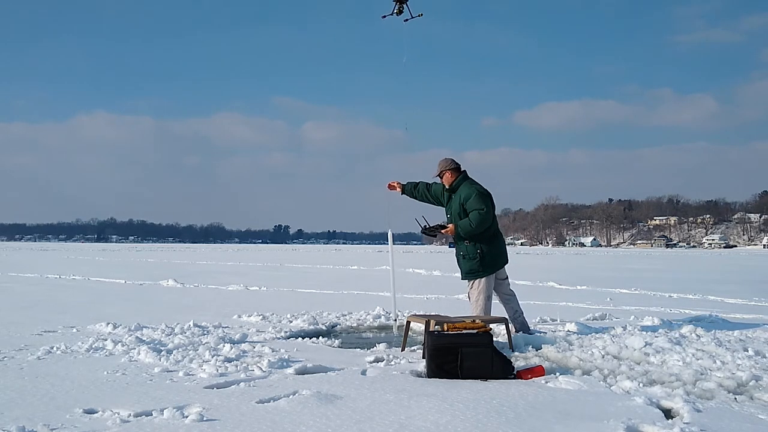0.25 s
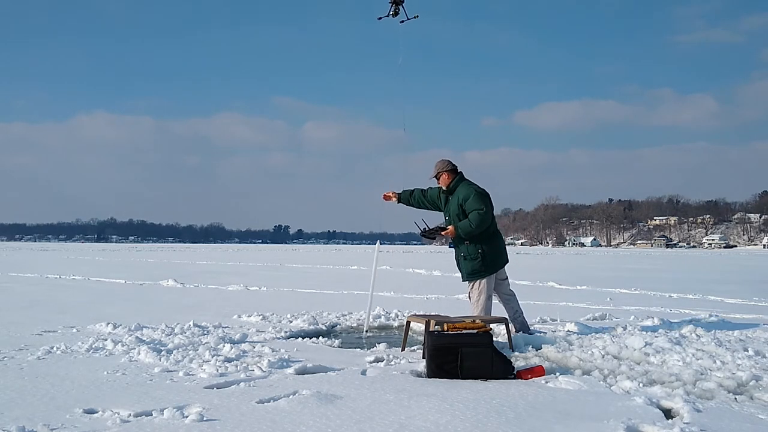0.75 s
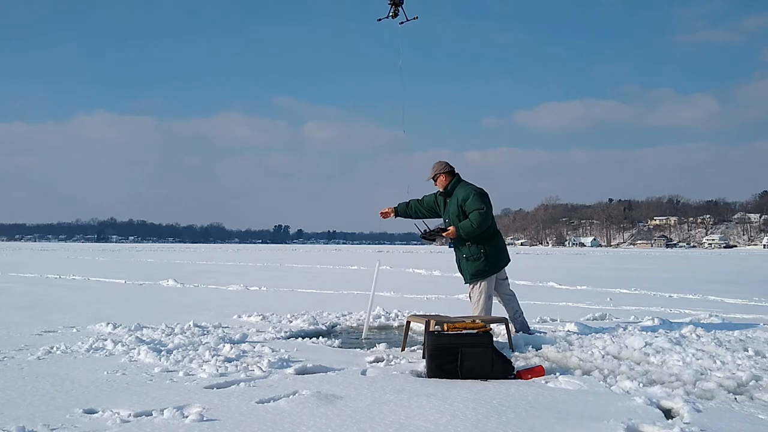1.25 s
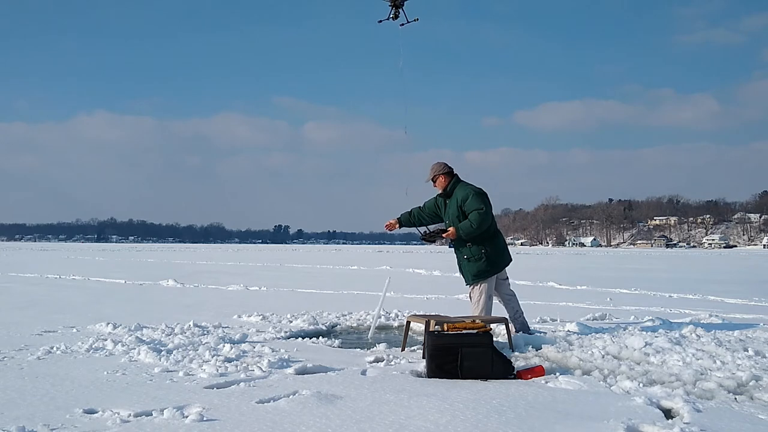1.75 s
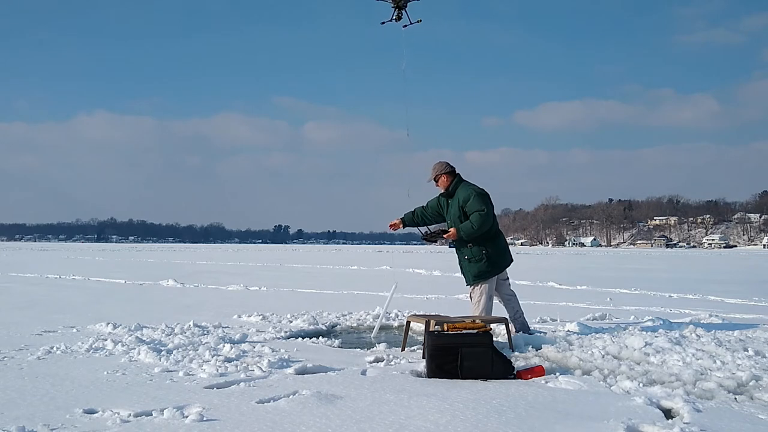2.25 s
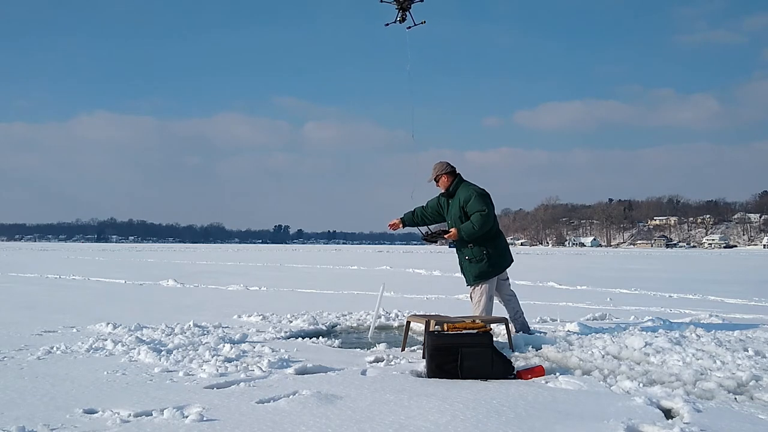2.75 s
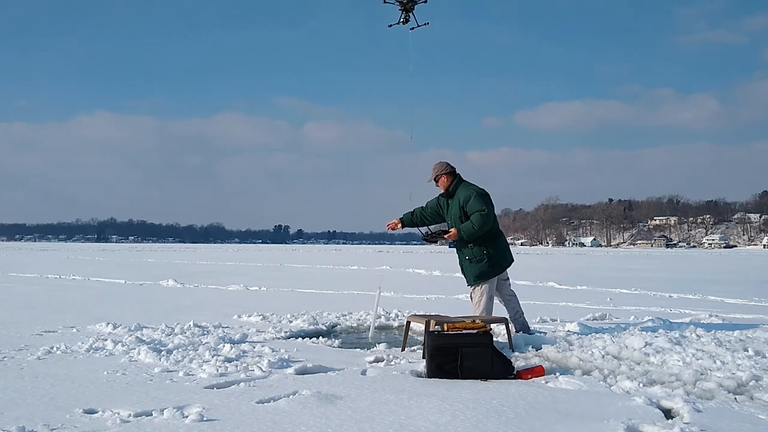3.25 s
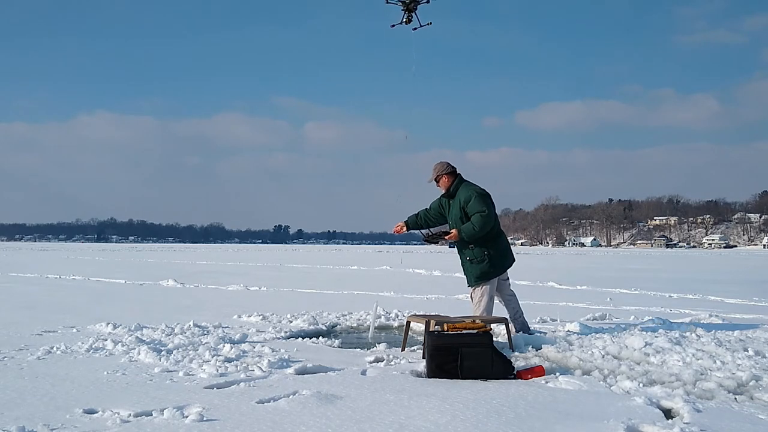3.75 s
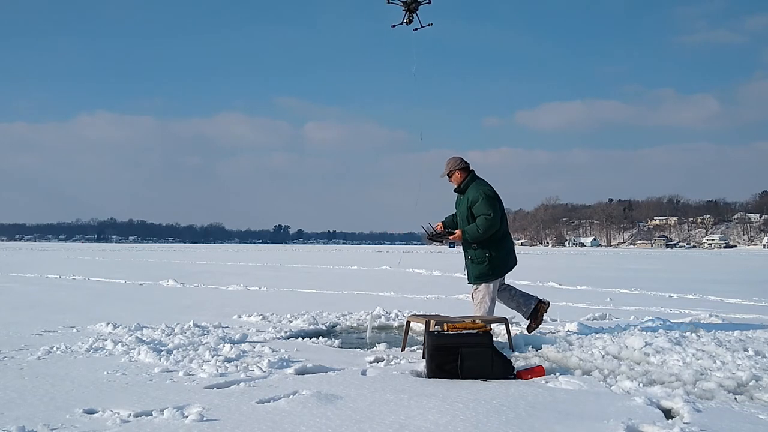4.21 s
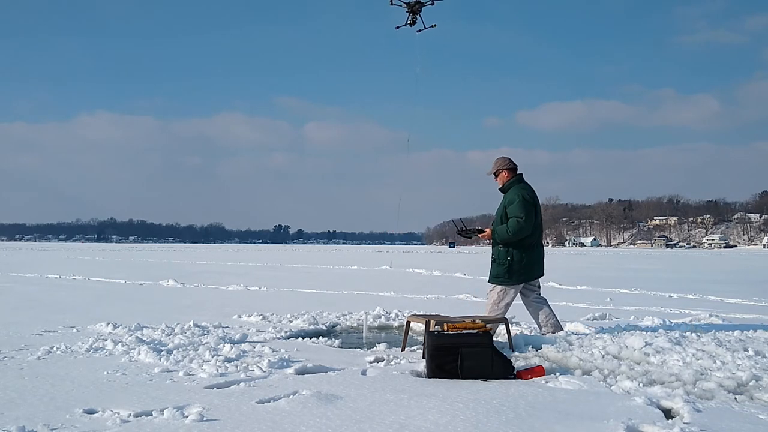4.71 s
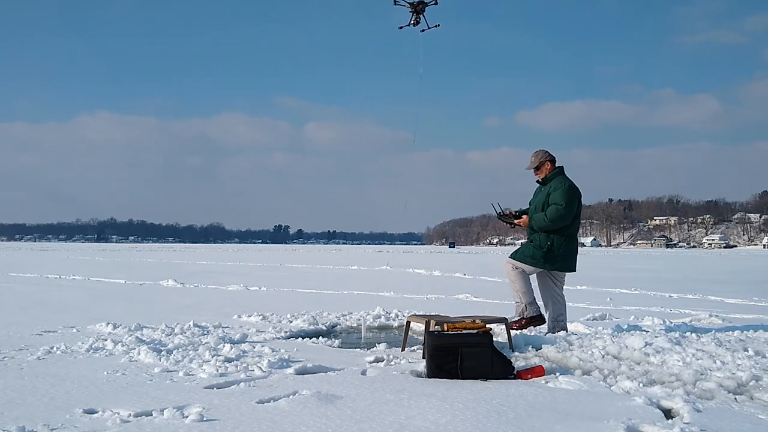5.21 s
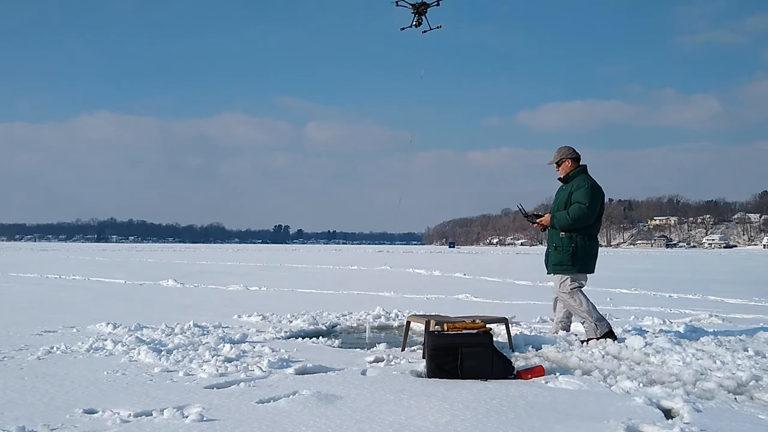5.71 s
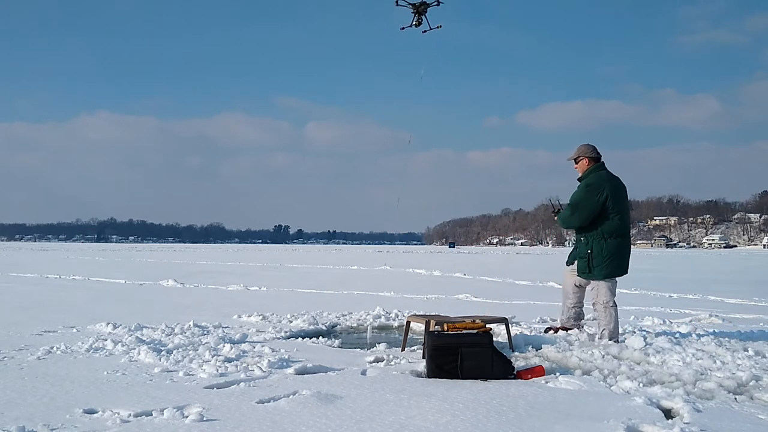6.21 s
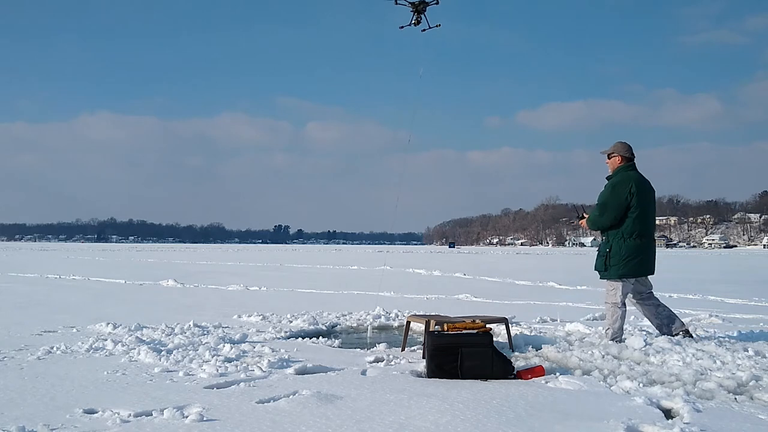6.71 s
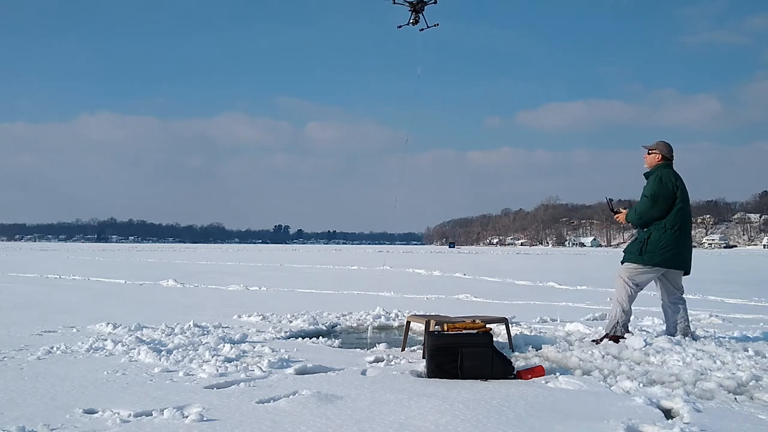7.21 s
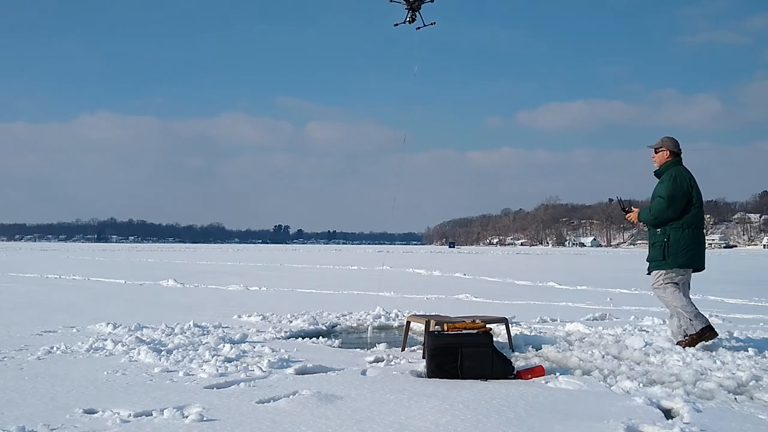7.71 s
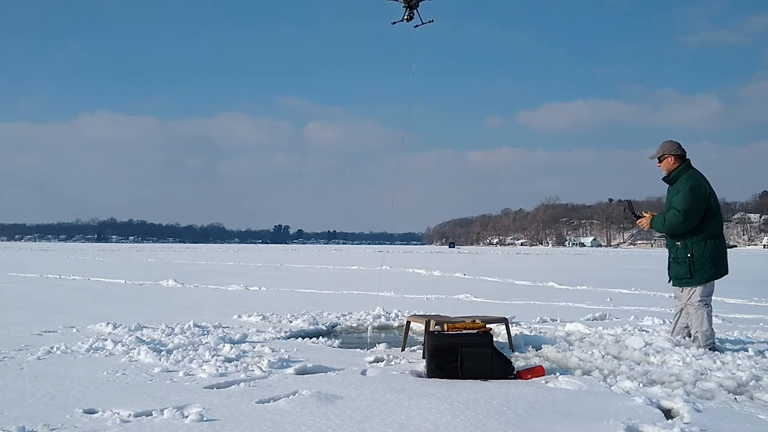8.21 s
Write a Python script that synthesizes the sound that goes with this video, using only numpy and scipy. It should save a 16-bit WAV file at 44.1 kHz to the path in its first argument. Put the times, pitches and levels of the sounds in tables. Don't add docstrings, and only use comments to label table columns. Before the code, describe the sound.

A multirotor drone hovers steadily overhead with rushing, fluttering blade noise and a thin motor whine while wind thumps the microphone on an open frozen lake.

```python
import sys
import numpy as np
from scipy import signal
from scipy.fft import rfft, irfft, next_fast_len
from scipy.io import wavfile
from scipy.ndimage import uniform_filter1d, map_coordinates

SR = 44100
rng = np.random.default_rng(int(sys.argv[2]) if len(sys.argv) > 2 else 0)


def amplitude_ratio(level_db):
    exponent = np.asarray(level_db, float) / 20
    return 10 ** exponent


def to_wav(s):
    ch = np.atleast_2d(s).T
    pcm = np.round(np.clip(ch, -1, 1) * 32767)
    wavfile.write(sys.argv[1], SR, pcm.astype(np.int16))


N = 373067
SIZE = next_fast_len(N)
HZ = np.maximum(np.arange(SIZE // 2 + 1) * SR / SIZE, 1)
TIME = np.arange(N) / SR

# start_s, whine_hz
MOTOR_1 = [(0, 5240), (.35, 5185), (.7, 5260), (.85, 5210), (1.1, 5240), (1.2, 5200), (1.4, 5235),
           (1.8, 5190), (2.15, 5360), (2.4, 5250), (2.55, 5260), (2.75, 5200), (3.15, 5320), (3.3, 5255),
           (3.5, 5290), (3.9, 5230), (4.1, 5320), (4.35, 5210), (4.6, 5290), (4.7, 5255), (4.85, 5320),
           (5.0, 5285), (5.15, 5240), (5.3, 5280), (5.5, 5200), (5.62, 5300), (5.9, 5360), (6.2, 5440),
           (6.5, 5310), (6.7, 5380), (7.3, 5430), (7.7, 5520), (8.0, 5480), (8.3, 5530), (8.46, 5480)]
MOTOR_2 = [(0, 5130), (.5, 5150), (.8, 5120), (1.5, 5135), (1.8, 5120), (2.2, 5150), (2.5, 5140),
           (2.8, 5110), (3.2, 5150), (3.6, 5130), (4.0, 5170), (4.3, 5120), (4.6, 5140), (4.95, 5180),
           (5.1, 5150), (5.5, 5110), (5.65, 5150), (5.9, 5180), (6.05, 5160), (6.5, 5140), (6.75, 5115),
           (7.1, 5170), (7.45, 5190), (7.75, 5170), (8.0, 5120), (8.2, 5180), (8.46, 5110)]
# start_s, blade_rate_hz
ROTOR_3 = [(0, 170), (2, 170.5), (4.2, 173), (4.7, 175.5), (5.3, 177), (5.5, 172), (5.75, 170),
           (6.2, 172.5), (6.5, 170.5), (7.0, 172.5), (7.5, 176), (8.0, 173.5), (8.3, 176), (8.46, 174)]
ROTOR_4_HZ, WANDER_HZ = 167, 0.9
POLES = 28
HUNT, HUNT_PER_S = 0.0027, 15
HOVER_HZ, STRAIN_PER_HZ = 186.5, 0.0003
LOAD_DB_PER_HZ = 0.36

# swish_db, whine_db
ROTOR_SHARE = [
    (3, 0),
    (-6, 0),
    (-9.5, -7),
    (-13, -6),
]
# multiple_of_blade_rate, rotor_1_db, rotor_2_db, rotor_3_db, rotor_4_db
BLADE_HUM = [(2, -64, -61, -79, -72), (3, -71, -67.5, -64, -64.5), (4, -72, -89, -91, -70),
             (5, -70, -70, -65.5, -71.5), (7, -68, -74.5, -81, -130), (8, -92, -69.5, -67.5, -80),
             (9, -71, -92, -102, -89), (10, -89, -79, -73, -117), (12, -71.5, -75, -95, -96),
             (14, -70, -70, -75, -76), (16, -75, -77.5, -70.5, -80), (19, -72, -75, -89, -81)]
# pitch_hz, density_db_per_hz
SWISH = [(200, -25), (500, -30), (900, -10), (1400, -14), (1750, -12.5), (2150, -12.5), (3000, -15.5),
         (4000, -58), (4400, -38.5), (6100, -42.5), (7200, -7.5), (9000, -57), (11000, -20), (15000, -30)]
# pitch_hz, width_hz, level_db
FRAME_RINGS = [(2761, 283, -0.5), (2953, 58, -13.5), (3275, 72, -1), (3669, 280, -6.5), (4561, 106, -6),
               (4826, 110, -2.5), (5100, 250, 0.5)]
# start_s, level_db
DRIFT = [(0, -42), (1.6, -42), (2.8, -42), (3.6, -44), (5.5, -44.5), (6.7, -43), (7.5, -45), (8.0, -42.5),
         (8.46, -42)]
ARM_HZ, ARM_WIDTH_HZ, ARM_DB, ARM_SWELL_DB = 3597, 110, -16, 2.2

# pitch_hz, width_hz, level_db
MOTOR_BELLS = [(5180, 150, 3.5), (5400, 150, -7), (4940, 200, -5)]
# start_s, motor_1_db, motor_2_db
FACING = [(0, 0, -1), (.8, 0, 0), (1.8, 1, 0), (2.2, 2, -5), (2.7, 1, 0), (3.2, 0, -2), (4.0, 0, 0),
          (4.7, 0, -2), (5.0, 1, 0), (5.55, 1, 0), (5.7, -1, -5), (6.0, 3, -1), (6.15, 0, 4), (6.4, 3, 2),
          (6.5, 7, 3), (6.62, -3, 5), (7.3, -4, 3), (7.8, -6, 0), (8.25, -6, 1), (8.46, -6, -3)]
WHINE_DB, WHINE_SAG_DB_PER_S = -41, -0.72
NULL_S, NULL_LENGTH_S, NULL_DB = 7.57, 0.19, -16
BEARING_DB = -13

# start_s, level_db
SWITCHING = [(0.0, -62), (0.52, -62), (0.75, -55), (0.82, -70), (1.48, -61), (1.72, -64), (1.81, -85),
             (1.92, -66), (2.12, -45), (2.83, -75), (3.16, -45), (3.25, -56), (3.91, -64), (4.1, -48),
             (4.38, -68), (4.81, -49), (5.46, -68), (5.7, -53), (6.93, -51), (7.4, -52), (7.9, -60),
             (8.0, -50), (8.2, -60), (8.46, -48)]
# start_s, pitch_hz
SWITCHING_CENTRE = [(0, 15700), (1.8, 15700), (2.2, 15630), (2.7, 15710), (4.1, 15680), (5.0, 15670),
                    (5.5, 15690), (6.4, 15630), (6.85, 15640), (7.3, 15700), (8.0, 15740), (8.46, 15720)]
SWITCHING_WIDTH_HZ, SWITCHING_FLICKER_DB = 84, 2.5

# start_s, lag_ms
ICE_LAG = [(0, 2.3), (5.5, 2.305), (7.3, 2.27), (8.46, 2.29)]
ROTOR_LAG = [0, -.015, .015, .025]
# pitch_hz, level_db
SNOW_CRUST = [(200, -.5), (2300, -.8), (3000, -5), (4500, -8), (8000, -16)]
# pitch_hz, level_db
STRAY = [(300, 6), (1200, 6), (2000, 4), (3500, -1), (8000, -4.5)]

# pitch_hz, left_minus_right_db
PORT_BALANCE = [(300, -0.5), (1300, -1.5), (2400, -6), (3000, -2.5), (3250, -8.5), (3500, -5), (4400, -3),
                (6500, -10.5), (8500, 21.5), (10500, -5), (15000, -7)]
# pitch_hz, left_lead_rad
PORT_PHASE = [(300, -.3), (1300, -.7), (2500, -.6), (7500, -.6), (8100, -.5), (9600, -2.4), (10700, -1.5),
              (14000, -1.7), (15700, -2.3)]
# pitch_hz, width_hz, left_db, right_db
WHISTLES = [(4090, 70, -75, -72), (5865, 110, -84, -67), (7090, 100, -74, -63), (7265, 110, -66, -70),
            (7790, 80, -75, -82), (8115, 60, -86, -76), (9550, 85, -65, -57.5), (10680, 150, -76, -82),
            (12990, 70, -92, -78), (13900, 100, -82, -84), (14300, 120, -81, -72), (14720, 150, -72, -75)]
# pitch_hz, density_db_per_hz
HISS_LEFT = [(300, -28), (4000, 1.5), (5300, -0.5), (5700, -4), (6400, -4.5), (7000, -13), (8000, -1.5),
             (9200, 0), (10000, -4), (11400, -19), (12300, -17), (15500, -8.5)]
HISS_RIGHT = [(300, -42), (4000, -16), (6200, 1.5), (8500, 2.5), (10000, 7), (12000, -11.5), (15500, 4.5)]
HISS_DB = -54

# start_s, gust_db, bite_db
GUSTS = [(0.0, -31.5, -10.5), (0.38, -34, -12), (0.64, -31.5, -12), (1.06, -36.5, -11), (1.22, -35, -12.5),
         (1.74, -33.5, -17.5), (2.05, -31.5, -20), (3.01, -32.5, -10), (3.53, -37, -15.5), (3.77, -37, -11),
         (4.38, -34.5, -17), (4.57, -36, -13.5), (5.98, -34, -12), (6.2, -38.5, -17), (6.62, -34.5, -16),
         (7.61, -36, -20.5), (7.78, -35.5, -21), (8.46, -39.5, -14.5)]
# pitch_hz, density_db_per_hz
WIND_RIGHT = [(12, -76), (20, -27), (38, -21), (91, -1), (140, 1), (187, -1.5), (370, -6.5), (536, -17),
              (800, -36.5), (1040, -44.5), (1760, -120)]
WIND_LEFT = [(20, -21), (45, -19), (65, -6), (92, 0), (130, -6), (190, -11), (230, -20), (290, -29),
             (600, -50)]
PUFF_DB, PUFF_PER_S, BITE_SPREAD_DB = 1.2, 11, 1.5
LEE_DB, LEE_SPREAD_DB, LEE_FOLLOW = -51.5, 3.0, 0.5
# start_s, peak_db, pitch_hz
THUMPS = [(0.014, -8.5, 182), (0.037, -7, 228), (0.082, -13.5, 250.0), (0.175, -14, 181),
          (0.289, -14.5, 295), (0.459, -10.5, 263), (0.486, -12, 243), (0.507, -12, 188),
          (0.54, -15, 220.0), (0.554, -9.5, 158), (0.588, -8.5, 220.0), (0.614, -8, 200.0),
          (0.837, -10, 233), (0.871, -10, 190.0), (1.039, -8.5, 202), (1.055, -8, 260.0), (1.401, -11, 193),
          (1.927, -11, 224), (1.989, -11.5, 187), (2.241, -10, 242), (2.297, -8.5, 231), (2.427, -11, 178),
          (2.592, -12, 170.0), (2.649, -9.5, 209), (2.683, -9, 199), (2.776, -14, 258), (2.791, -13, 200.0),
          (2.915, -8, 240.0), (2.951, -14, 292), (2.973, -15, 190.0), (3.068, -5.5, 157),
          (3.088, -11, 260.0), (3.882, -12.5, 246), (3.949, -13, 206), (4.078, -9, 210), (4.372, -13, 231),
          (4.383, -8, 186), (4.397, -16, 242), (4.418, -8.5, 228), (4.446, -13, 237), (4.587, -12.5, 222),
          (5.129, -12, 190.0), (5.199, -12, 268), (5.318, -10, 189), (5.505, -11, 270.0), (5.62, -11, 256),
          (5.715, -11.5, 276), (5.888, -10, 254), (5.931, -12, 210.0), (5.967, -8.5, 177),
          (6.038, -10, 267), (6.459, -8.5, 193), (6.753, -11, 223), (7.809, -11.5, 250.0),
          (7.885, -11.5, 170.0),
          (0.071, -18, 199), (0.127, -15, 230.0), (0.211, -11, 181), (0.393, -18, 248),
            (0.446, -11, 220.0), (0.527, -18, 230.0), (0.643, -17, 270.0), (0.683, -17, 210.0),
            (0.715, -11, 210.0), (0.732, -13.5, 190.0), (0.782, -13, 180.0), (1.09, -9, 213),
            (1.534, -14.5, 202), (1.659, -16, 220.0), (1.836, -17.5, 218), (2.058, -17.5, 180.0),
            (2.2, -15, 150.0), (2.365, -13, 200.0), (2.474, -16, 178), (2.573, -15, 190.0),
            (2.665, -16, 220.0), (2.703, -15, 200.0), (2.868, -12, 191), (3.005, -19, 237),
            (3.036, -13, 237), (3.109, -16, 170.0), (3.162, -12, 248), (3.215, -19, 200.0),
            (3.28, -11.5, 237), (3.753, -11, 210.0), (4.308, -13, 200.0), (4.34, -13, 190.0),
            (4.505, -15, 200.0), (4.674, -15, 207), (4.691, -13.5, 220.0), (4.831, -13, 251),
            (4.879, -13.5, 274), (4.899, -12.5, 210.0), (4.984, -13, 266), (5.106, -13, 200.0),
            (5.236, -16, 287), (5.685, -18, 188), (5.823, -13, 250.0), (5.843, -16.5, 330),
            (5.914, -13.5, 260.0), (5.999, -18, 220.0), (6.366, -11, 188), (6.431, -12, 225),
            (6.491, -13.5, 212), (6.843, -14, 240.0), (7.157, -14.5, 210.0), (7.226, -12.5, 170.0),
            (7.338, -12, 207), (7.688, -16, 180.0), (8.273, -15.5, 195),
          (0.151, -18, 180.0), (0.242, -20, 285), (0.32, -14, 160.0), (0.357, -18, 160.0),
        (0.433, -13, 230.0), (0.626, -19, 250.0), (0.702, -20, 280.0), (0.821, -17, 199), (0.986, -18, 248),
        (1.156, -16, 208), (1.238, -17.5, 285), (1.275, -17, 210.0), (1.32, -16, 246),
        (1.475, -17.5, 200.0), (1.515, -15.5, 220.0), (1.698, -20, 230.0), (1.784, -17, 220.0),
        (1.877, -19, 160.0), (1.896, -13.5, 200.0), (1.912, -9.5, 150.0), (1.942, -15, 190.0),
        (2.02, -15, 304), (2.036, -18, 230.0), (2.083, -22, 200.0), (2.161, -18, 179), (2.39, -25, 180.0),
        (2.447, -16, 150.0), (2.489, -22, 160.0), (2.61, -17, 257), (2.76, -22, 160.0), (2.889, -17, 242),
        (3.176, -16, 239), (3.505, -13.5, 198), (3.666, -19.5, 202), (3.733, -16, 191), (4.178, -14.5, 212),
        (4.25, -17, 176), (4.526, -18, 210.0), (4.615, -18, 332), (4.804, -15, 228), (5.005, -14.5, 240.0),
        (5.399, -17, 190.0), (6.073, -13.5, 170.0), (6.175, -15.5, 201), (6.708, -19, 306),
        (6.911, -18, 190.0), (6.941, -15, 177), (6.971, -16, 208), (7.319, -20, 200.0), (7.846, -17.5, 222),
        (8.048, -14.5, 197), (8.123, -18, 274), (8.191, -15.5, 210.0), (8.258, -18, 233),
        (8.441, -18.5, 188)]
EDDY_CYCLES, EDDY_PHASE, EDDY_PHASE_SPREAD = 0.72, 2.9, 0.9
EDGE_HZ, EDGE_DB, EDGE_DB_PER_HZ, EDDY_SAG = 480, -16, 0.045, 0.12

# start_s, level_db, pitch_hz, length_s
CRUNCH = [
    (8.377, -56, 11050, 0.018),
    (8.446, -56, 8200, 0.028),
]

# pitch_hz, density_db_per_hz
GATE_FLOOR = [(300, -125), (650, -98), (1100, -95), (4200, -95.5), (5700, -95), (6300, -97), (7800, -101),
              (9000, -107), (13000, -106), (14700, -101), (15100, -92), (15500, -93)]
FRAME_SIZE, FRAME_SHIFT, BAND_BINS, TOP_HZ = 2048, 504, 12, 15800
MASK_DB, MASK_BINS, MASK_FROM_HZ = -11.3, 45, 950


def level(x, db):
    return x * amplitude_ratio(db) / np.sqrt(np.mean(x ** 2))


def curves(table):
    s, *columns = np.transpose(table)
    return [np.interp(TIME, s, c) for c in columns]


def over_hz(points):
    hz, value = np.transpose(points)
    return np.interp(np.log(HZ), np.log(np.maximum(hz, 1)), value)


def rings(hz, modes):
    return np.sqrt(sum((amplitude_ratio(db) / (1 + (2 * (hz - f) / w) ** 2)) ** 2 for f, w, db in modes))


def colour(x, gain):
    return irfft(rfft(x, SIZE) * gain, SIZE)[..., :N]


def walk(rate):
    k = int(SR / rate)
    held = np.repeat(rng.standard_normal(N // k + 1), k)
    return 1.331 * uniform_filter1d(uniform_filter1d(held, k), k)[:N]


def blade_rates():
    near = [curves(motor)[0] / POLES * (1 + HUNT * walk(HUNT_PER_S)) for motor in (MOTOR_1, MOTOR_2)]
    strain = STRAIN_PER_HZ * np.maximum(near[0] - HOVER_HZ, 0) * walk(90)
    far = [hz + WANDER_HZ * walk(4) for hz in (curves(ROTOR_3)[0], ROTOR_4_HZ)]
    return [near[0] * (1 + strain), near[1]] + far


def whine(hz, turn, orders, bell, flutter_db):
    return sum(rings(k * hz, bell) * amplitude_ratio(flutter_db * walk(14)) * np.sin(k * turn) for k in orders)


def rotor(hz, hum_db, swish_db, whine_db):
    hz = hz * (1 + 0.000781 * walk(25))
    turn = 2 * np.pi * np.cumsum(hz) / SR + 2 * np.pi * rng.random()
    hum = 0
    for k, db in hum_db:
        swell = amplitude_ratio(db + 1.1 * walk(7.8))
        roughness = 1 + 0.16 * k * walk(45)
        hum = hum + swell * roughness * np.sin(k * turn + 2 * np.pi * rng.random())
    hum = hum * amplitude_ratio(LOAD_DB_PER_HZ * (hz - np.mean(hz)))
    chop = 1 + 0.84 * np.cos(turn) + 0.32 * np.cos(2 * turn)
    swish = amplitude_ratio(swish_db + 0.34 * walk(23)) * chop * rng.standard_normal(N)
    return hum, swish, amplitude_ratio(whine_db) * whine(hz, turn, (26, 28), MOTOR_BELLS, 2.2)


def off_ice(x, lag_ms):
    dulled = colour(x, amplitude_ratio(over_hz(SNOW_CRUST)))
    late = map_coordinates(dulled, [np.arange(N) - lag_ms * SR / 1000], order=3)
    return x + late


def arm():
    ring = colour(rng.standard_normal(N), rings(HZ, [(ARM_HZ, ARM_WIDTH_HZ, 0)]))
    return level(ring, ARM_DB) * amplitude_ratio(ARM_SWELL_DB * walk(3.6))


def bearings():
    return level(colour(rng.standard_normal(N), rings(HZ, MOTOR_BELLS[:1])), BEARING_DB)


def switching():
    slow = colour(rng.standard_normal((2, N)), rings(HZ, [(0, 2 * SWITCHING_WIDTH_HZ, 0)]) ** 2)
    turn = 2 * np.pi * np.cumsum(curves(SWITCHING_CENTRE)[0]) / SR
    band = slow[0] * np.cos(turn) + slow[1] * np.sin(turn)
    return amplitude_ratio(curves(SWITCHING)[0] + SWITCHING_FLICKER_DB * walk(8)) * level(band, 0.6)


def drone():
    swish_db = curves(DRIFT)[0]
    ice_lag_ms = curves(ICE_LAG)[0]
    hidden_db = NULL_DB * np.exp(-((TIME - NULL_S) / NULL_LENGTH_S) ** 4)
    whine_db = WHINE_DB + WHINE_SAG_DB_PER_S * TIME + hidden_db
    facing = curves(FACING) + [0, 0]
    body = amplitude_ratio(over_hz(SWISH)) + rings(HZ, FRAME_RINGS)
    ripple_db = 1.4 * walk(22) + 1.0 * walk(30)
    orders, *hums = np.transpose(BLADE_HUM)
    air, motors = 0, 0
    each = zip(blade_rates(), hums, ROTOR_SHARE, ROTOR_LAG, facing)
    for hz, hum_db, (share_db, motor_db), offset_ms, seen_db in each:
        hum_table = zip(np.round(orders), hum_db)
        hum, swish, tone = rotor(hz, hum_table, share_db, motor_db + seen_db)
        blades = hum + amplitude_ratio(swish_db + 1.5 + ripple_db) * colour(swish, body)
        air = air + off_ice(blades, ice_lag_ms + offset_ms)
        motors = motors + tone
    motors = amplitude_ratio(whine_db) * (level(motors, -4.6) + bearings())
    sound = air + amplitude_ratio(swish_db) * arm() + motors + switching()
    scatter = body * amplitude_ratio(over_hz(STRAY))
    stray = [off_ice(colour(row, scatter), ice_lag_ms) for row in rng.standard_normal((2, N))]
    half = amplitude_ratio(over_hz(PORT_BALANCE) / 2) * np.exp(0.5j * over_hz(PORT_PHASE))
    return colour(sound + amplitude_ratio(swish_db) * np.array(stray), np.array([half, 1 / half]))


def ports():
    hiss_gain = amplitude_ratio(np.array([over_hz(HISS_LEFT), over_hz(HISS_RIGHT)]))
    hiss = colour(rng.standard_normal((2, N)), hiss_gain)
    out = level(hiss, HISS_DB) * amplitude_ratio(1.3 * np.array([walk(25), walk(25)]))
    for hz, width, *db in WHISTLES:
        shared, own = rng.standard_normal(N), rng.standard_normal((2, N))
        opposed = 1.4 * shared * np.array([[1], [-1]])
        band = colour(opposed + own, rings(HZ, [(hz, width, 0)]))
        out = out + level(band, 0) * amplitude_ratio(np.array(db)[:, None] + 3.0 * walk(25))
    return out


def eddies(rate, spread_db, smooth):
    size_db = spread_db * np.minimum(rng.exponential(size=N), 1.7)
    kicks = (rng.random(N) < rate / SR) * amplitude_ratio(size_db) * rng.choice([-1, 1], N)
    return level(kicks, 0) + smooth * rng.standard_normal(N)


def thumps():
    s, db, hz = np.transpose(THUMPS)[..., None]
    phase = EDDY_PHASE + EDDY_PHASE_SPREAD * rng.standard_normal((len(s), 1))
    step = np.arange(-600, 600)
    cycles = step * hz / SR
    push = np.cos(2 * np.pi * (cycles - EDDY_SAG * cycles ** 2) + phase)
    edge_db = EDGE_DB + EDGE_DB_PER_HZ * (hz - np.mean(hz))
    edge = amplitude_ratio(edge_db) * np.cos(2 * np.pi * EDGE_HZ * step / SR + phase)
    passing = amplitude_ratio(db) * np.exp(-(cycles / EDDY_CYCLES) ** 2)
    out = np.zeros(N)
    np.add.at(out, np.clip((s * SR).astype(int) + step, 0, N - 1), passing * (push + edge))
    return out


def wind():
    gust_db, bite_db = curves(GUSTS)
    gust_db = gust_db + PUFF_DB * walk(PUFF_PER_S)
    bite_db = bite_db + BITE_SPREAD_DB * walk(11)
    lee_db = LEE_DB + LEE_FOLLOW * (gust_db - np.mean(gust_db)) + LEE_SPREAD_DB * walk(9.1)
    small = 1 / (1 + (300 / HZ) ** 4)
    common, shape = eddies(130, 5.7, 0.32), amplitude_ratio(over_hz(WIND_RIGHT))
    thud = colour(common + 0.76 * eddies(60, 2.6, 0.67), shape * (1 - small))
    bite = colour(common + 0.97 * eddies(160, 8.7, 0.24), shape * small)
    scale = np.sqrt(np.mean((thud + bite) ** 2))
    right = amplitude_ratio(gust_db + 8.0) * (thud + amplitude_ratio(bite_db + 9.5) * bite) / scale
    right = right + amplitude_ratio(-1.5) * thumps()
    slow = colour(eddies(60, 0.83, 0.13), amplitude_ratio(over_hz(WIND_LEFT)))
    left = amplitude_ratio(lee_db) * level(slow, 0.18)
    return np.array([left, right])


def boot():
    out = 0
    for s, db, hz, length in CRUNCH:
        grains = colour(eddies(900, 2.75, 0.33), rings(HZ, [(hz, 2500, 0)]))
        out = out + level(grains, db) * np.exp(-((TIME - s) / length) ** 2)
    return out


def scene():
    return drone() + ports() + wind() + boot()


def band_gate(x):
    plan = dict(fs=SR, window="cosine", nperseg=FRAME_SIZE, scaling="psd")
    hz, _, bins = signal.stft(np.pad(x, ((0, 0), (FRAME_SHIFT, 0))), **plan)
    power = uniform_filter1d(np.abs(bins) ** 2, size=7, axis=1)
    floor_hz, floor_db = np.transpose(GATE_FLOOR)
    floor = amplitude_ratio(np.interp(hz, floor_hz, floor_db)[:, None]) ** 2
    chance = rng.standard_normal((len(x), len(hz) // BAND_BINS + 2, bins.shape[2]))
    bands = chance[:, :1] + 0.8 * np.repeat(chance[:, 1:], BAND_BINS, axis=1)[:, :len(hz)]
    reserve_db = 4 * uniform_filter1d(bands, size=3, axis=2)
    nearby = uniform_filter1d(power, size=MASK_BINS, axis=1)
    masked = amplitude_ratio(MASK_DB) ** 2 * nearby * (hz > MASK_FROM_HZ)[:, None]
    alive = power > np.maximum(floor, masked) * amplitude_ratio(reserve_db) ** 2
    gated = signal.istft(bins * alive * (hz < TOP_HZ)[:, None], **plan)[1]
    return gated[:, FRAME_SHIFT:FRAME_SHIFT + N]


def roll_off(x):
    return signal.sosfilt(signal.butter(12, 16390, fs=SR, output="sos"), x)


def record(dry):
    rounded = 0.45 * np.tanh(dry / 0.45)
    mix = band_gate(rounded)
    return roll_off(mix)


dry = scene()
out = record(dry)
to_wav(out)
```